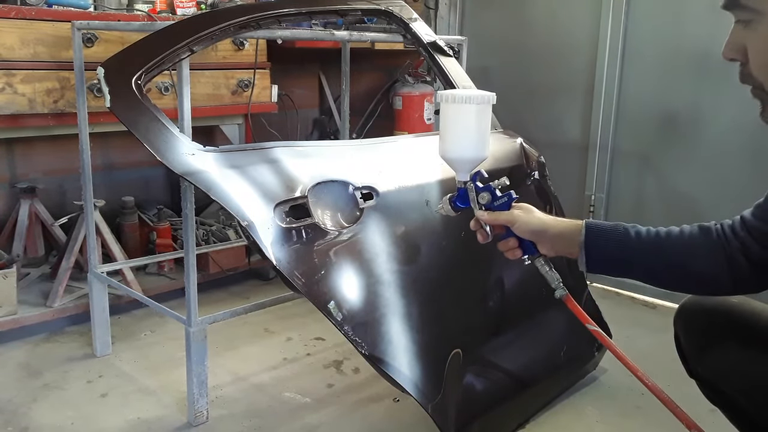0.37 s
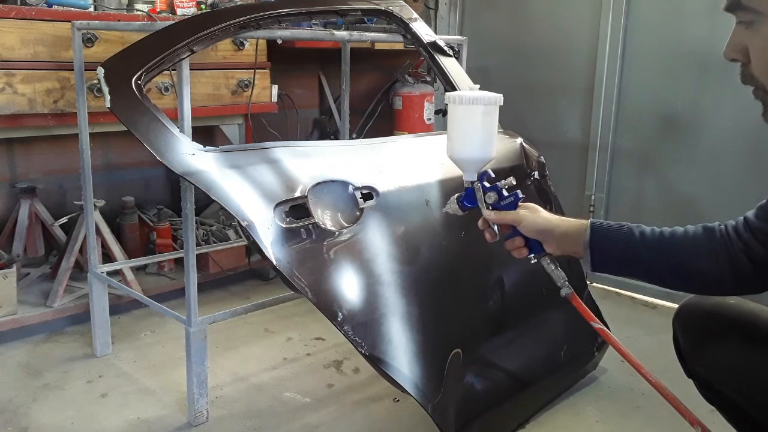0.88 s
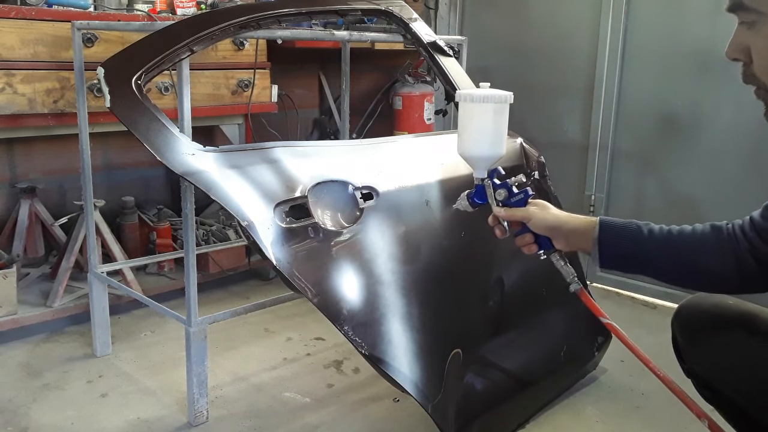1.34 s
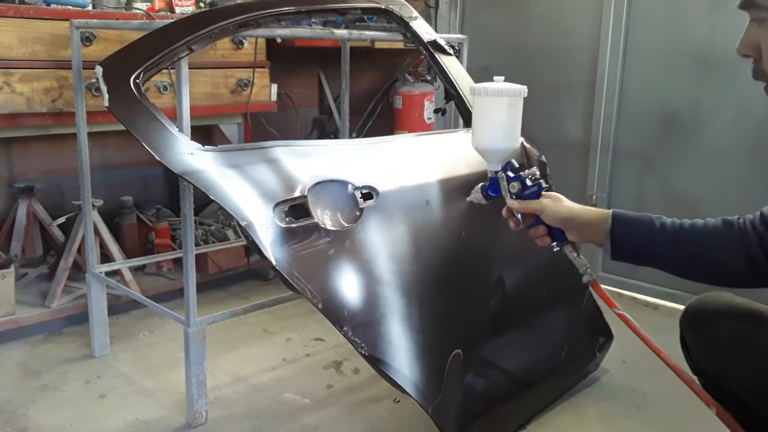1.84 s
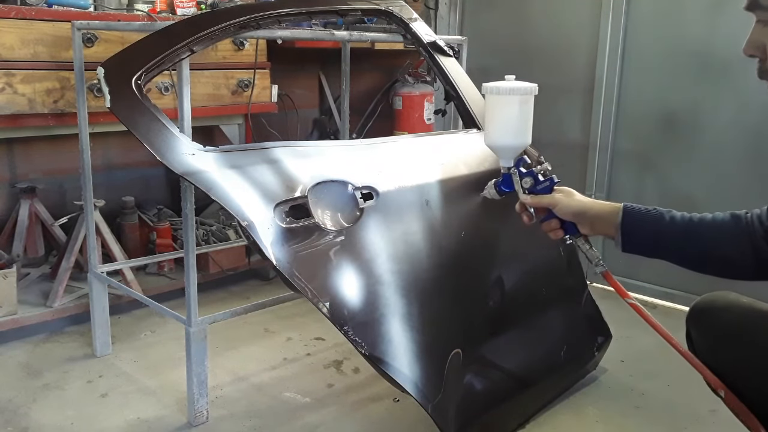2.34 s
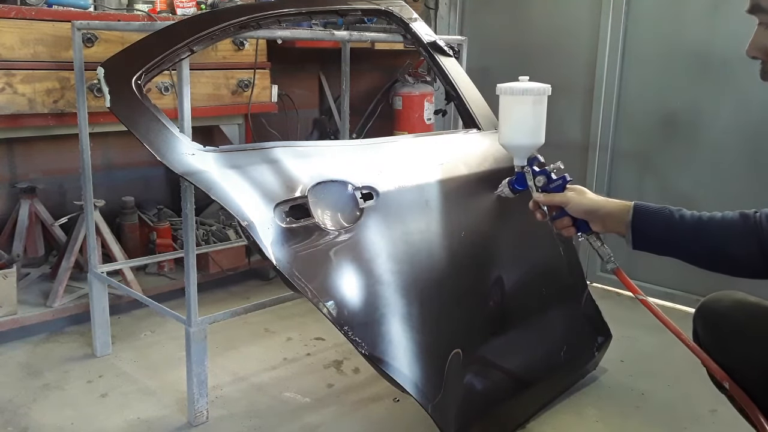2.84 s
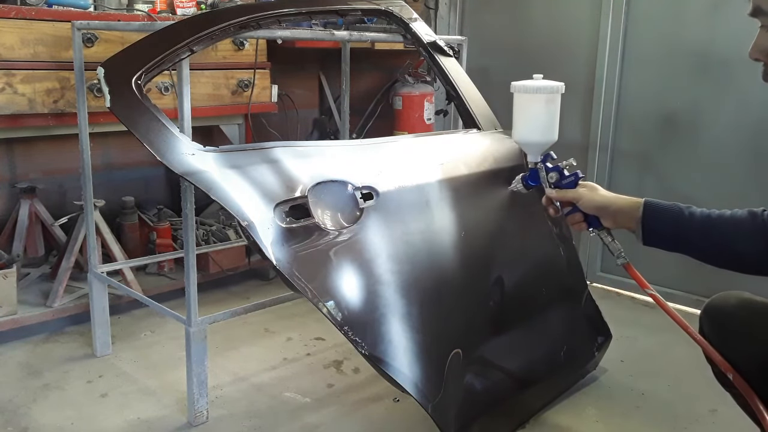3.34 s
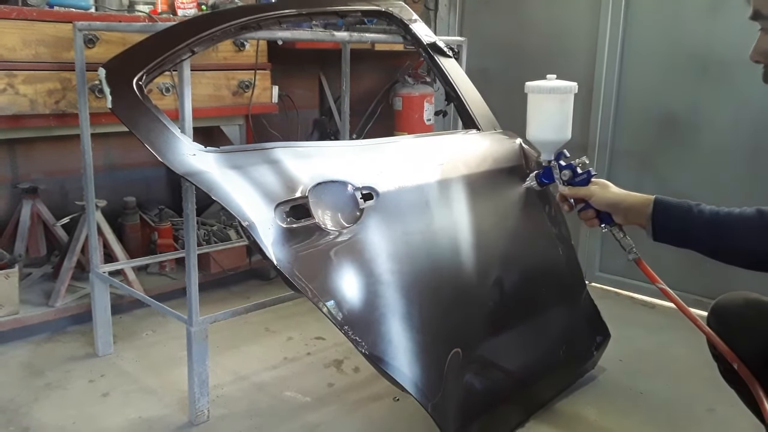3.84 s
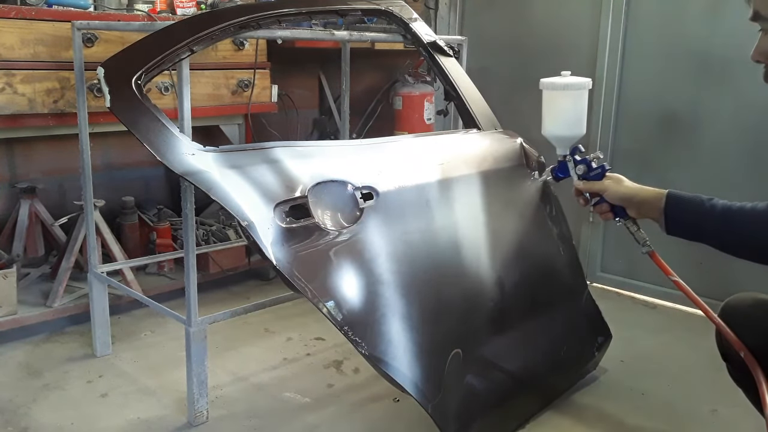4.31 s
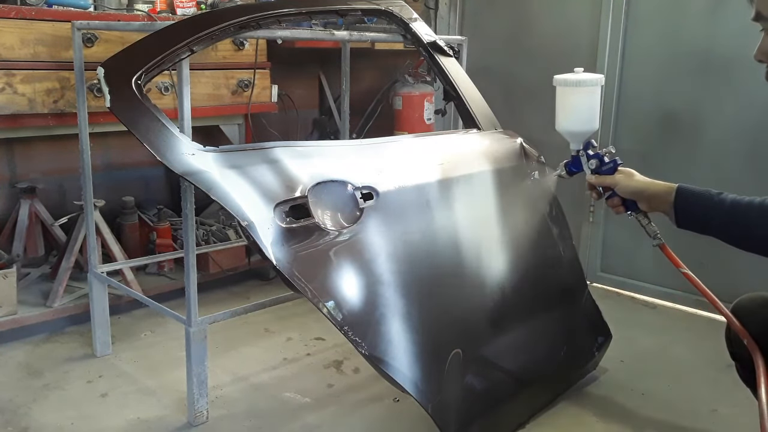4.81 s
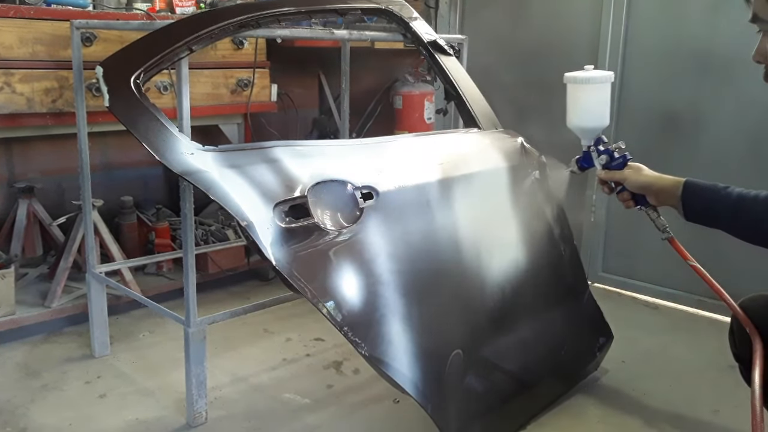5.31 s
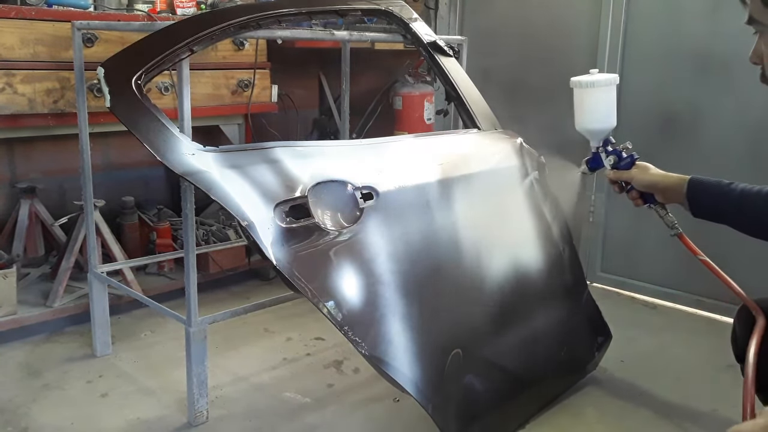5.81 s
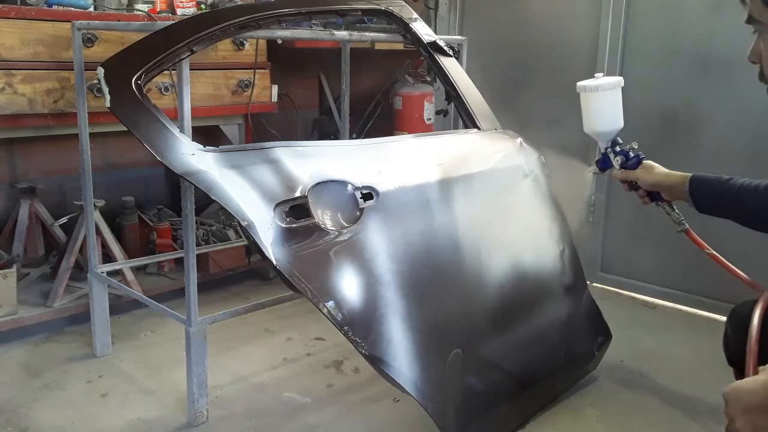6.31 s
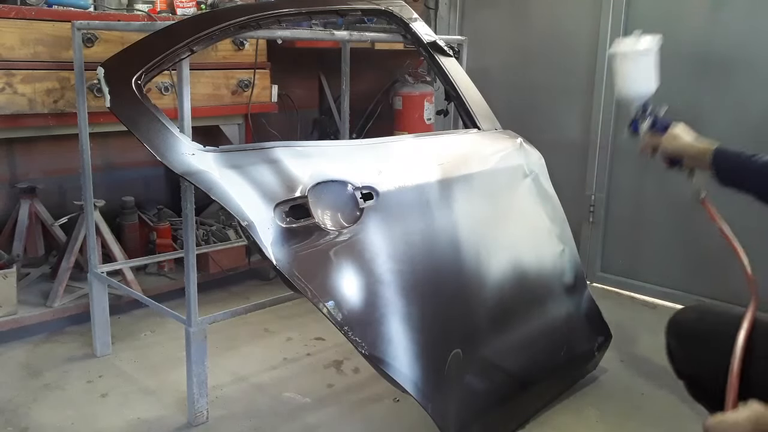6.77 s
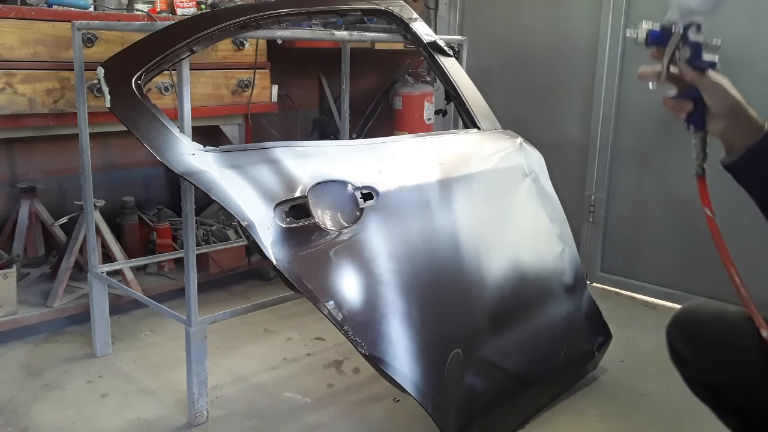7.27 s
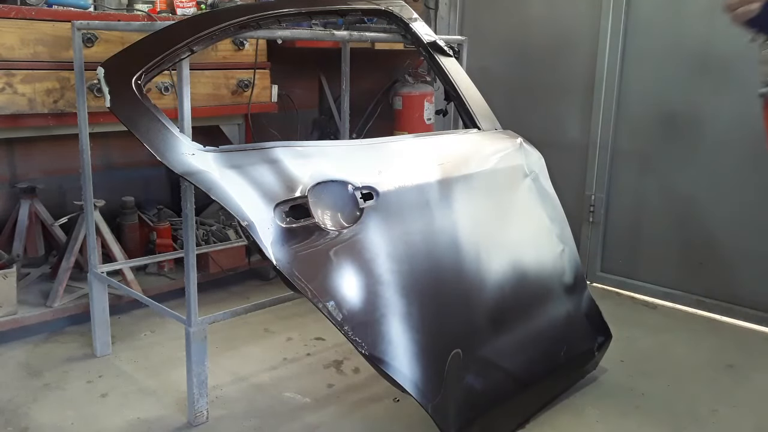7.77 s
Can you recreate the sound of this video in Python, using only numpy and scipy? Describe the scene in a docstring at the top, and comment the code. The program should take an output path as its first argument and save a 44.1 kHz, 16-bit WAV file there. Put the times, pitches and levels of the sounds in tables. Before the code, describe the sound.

A spray gun hisses loudly and steadily at a metal car door in a workshop, widens into a rougher rush, then cuts off with small clicks.

```python
"""In a hard-walled workshop a spray gun hisses at a steel door panel, draws away, closes in again and shuts off.
Turbulent air makes the fizz at the nozzle and a roar that grows as the paint fan opens, both flickering noise.
The blast drums resonant modes of the panel, mostly up close, and the walls store the sound and ring out after it.
Under it lie a low rumble, cloth rustle, scuffs and shuffles, which swell after the spraying among small clicks.
One microphone feeds both channels, and each channel has its own faint hiss."""
import sys
import numpy as np
from scipy import signal
from scipy.fft import rfft, irfft, next_fast_len
from scipy.io import wavfile
from scipy.ndimage import uniform_filter1d, map_coordinates

SR = 44100
rng = np.random.default_rng(int(sys.argv[2]) if len(sys.argv) > 2 else 0)


def gain_from_decibels(decibels):
    """Convert decibel values to linear amplitude factors."""
    exponent = np.asarray(decibels, float) / 20
    return 10 ** exponent


def unload_wav(signal):
    """Save mono or channel-first audio to the path in sys.argv[1] as 16-bit WAV at rate SR, clipped to [-1, 1]."""
    wavfile.write(
        sys.argv[1],
        SR,
        np.round(np.clip(np.atleast_2d(signal).T, -1, 1) * 32767).astype(np.int16),
    )


N = 348390

# the gun's air valve: (shutting time [s], time for the air left in the gun to fall by 60 dB [s])
AIR_VALVE = (6.732, 0.021)
# the painter's hand on the gun: (time [s], air level at the nozzle [dB], paint fan opening [0-1], gap to panel [m])
PAINTER_HAND = [(0.0, -22, 0, .14), (0.2, -23.5, 0, 0.094), (0.4, -23.5, 0, 0.13), (0.82, -23, 0, 0.097),
                (1.2, -23, 0.01, 0.13), (2.8, -23.5, 0.04, 0.17), (3.5, -23.5, 0.08, 0.25),
                (3.75, -25.5, 0.28, 0.37), (4.34, -27, 0.49, 0.75), (5.13, -24, 0.57, .4),
                (5.7, -25.5, 0.84, 0.59), (6.68, -25, 1, 0.18)]
# low-frequency colour of the building and of the buffeting blast: (frequency [Hz], relative density [dB per Hz])
RUMBLE_SPECTRUM = [(25, -30), (50, -11), (70, -2.5), (95, -5), (125, -5), (150, -3), (200, -4.5),
                   (320, -14.5), (600, -42)]


def gun():
    """Turbulent air: eddies flutter the whole jet and droplets spit in the fizz, until the valve shuts."""
    # colour of the air at the nozzle: (frequency [Hz], relative density [dB per Hz])
    fizz_spectrum = [(1000, -59.5), (2500, -29), (6000, -5), (11000, 1.5), (14800, -1), (15700, -0.5)]
    # colour of the wider jet: (frequency [Hz], relative density [dB per Hz])
    roar_spectrum = [(150, -53), (400, -23), (1000, -13), (2500, -7.5), (3600, -1), (5000, 2), (7000, -3),
                     (12000, -3), (16000, -19.5)]
    roar_db, paint_adds_db = -8, 10  # roar over the fizz with air alone; gain with the fan fully open
    spurt_db, spurt_s = 6, 0.06  # the nozzle fizzes up as the valve narrows

    air_db, paint, _ = curves(PAINTER_HAND)
    air_db = air_db + 0.18 * wobble(7) + 0.083 * wobble(25)
    before_shutting_s = AIR_VALVE[0] - np.arange(N) / SR
    spurt = spurt_db * np.clip(1 - before_shutting_s / spurt_s, 0, 1)
    fizz_gain = gain_from_decibels(air_db + spurt + 0.81 * wobble(400))
    fizz = fizz_gain * rush(fizz_spectrum, patchy_db=-0.86)
    roar_gain = gain_from_decibels(air_db + roar_db + paint_adds_db * paint + 0.41 * wobble(250))
    roar = roar_gain * rush(roar_spectrum, patchy_db=-0.2)
    return (fizz + roar) * after_shutting(AIR_VALVE[1])


def after_shutting(t60):
    """Gain 1 while the trigger is held, then a fall of 60 dB in t60 seconds."""
    return gain_from_decibels(-60 * np.clip(np.arange(N) / SR - AIR_VALVE[0], 0, None) / t60)


def bounced(x):
    """A small surface nearby returns the treble late; the comb of peaks glides as the extra path changes."""
    # the reflection's detour: (time [s], extra path [m])
    detour = [(0.0, 0.256), (0.4, 0.224), (3.3, 0.25), (5.0, 0.21), (6.0, 0.198), (6.7, 0.18)]
    bounce_db, bounce_above_hz, sound_m_per_s = -13.5, 4200, 343
    late = np.arange(N) - curves(detour)[0] / sound_m_per_s * SR
    treble = filtered(x, lambda hz: hz ** 4 / (hz ** 4 + bounce_above_hz ** 4))
    reflection = map_coordinates(treble, [late], order=3, mode="mirror")
    return x + gain_from_decibels(bounce_db) * reflection


def panel():
    """The air blast shakes the modes of the sheet metal, less as the gap grows, and they die after the jet stops."""
    # ringing modes of the door panel: (frequency [Hz], width [Hz], relative level [dB])
    panel_modes = [(141, 44, -3), (218, 37, -1.5), (301, 37, -1.5), (331, 24, 0), (423, 98, -2.5),
                   (569, 43, 1), (665, 290, -4.5)]
    # the door booms as the jet sweeps off its edge: (peak time [s], peak level [dB], rise [s])
    boom_moments = [(6.46, -58, .25), (6.61, -55.5, .2)]
    # colour of those booms: (frequency [Hz], relative density [dB per Hz])
    boom_spectrum = [(60, -7), (105, -12), (140, 4.5), (180, -8), (300, -23.5)]
    near_m, drumming_db, buffet_db = 0.1, -46, -67  # levels at this gap
    drumming_loss_db, buffet_loss_db = 14, 5.5  # per doubling of the gap
    gusts_db = 1.5  # unsteadiness of the blast

    gap_m = curves(PAINTER_HAND)[2]
    doublings = np.log2(np.clip(gap_m, 0.01, None) / near_m)
    ringing = filtered(rng.standard_normal(N), resonances(panel_modes))
    # little sound outside the modes' range
    shaking = unit(filtered(ringing, lambda hz: hz * hz / (hz * hz + 150 ** 2) / (1 + (hz / 800) ** 2)))
    drumming_gain = gain_from_decibels(drumming_db - drumming_loss_db * doublings + gusts_db * wobble(5.5))
    buffet_gain = gain_from_decibels(buffet_db - buffet_loss_db * doublings + gusts_db * wobble(11))
    blast = drumming_gain * shaking + buffet_gain * rush(RUMBLE_SPECTRUM, patchy_db=-2.5)
    booms = swells(boom_moments, t60=0.55) * rush(boom_spectrum, patchy_db=2.0)
    return blast * after_shutting(1.0) + booms


def shelves(x):
    """Steel around the room has narrow modes that ring along with the jet."""
    # modes of the steel: (frequency [Hz], width [Hz], level [dB])
    shelf_modes = [(137, 8, 0), (594.6, 7.4, 7), (763, 3.6, 1.5), (818, 7.2, 6.5)]
    return filtered(x, resonances(shelf_modes))


def workshop(x):
    """A diffuse field: the sound energy of each band is stored in the room and dies at its own speed."""
    # how long the room rings: (frequency [Hz], time to fall by 60 dB [s])
    room_decay = [(100, 0.7), (700, 0.88), (2000, 0.77), (5500, 0.62), (8000, 0.52), (12000, 0.37),
                  (16000, 0.27)]
    hz, t, z = signal.stft(x, SR, nperseg=256)
    energy = uniform_filter1d(np.abs(z) ** 2, size=3, axis=0)
    kept = gain_from_decibels(-2 * 60 * t[1] / along(room_decay, hz))  # share of energy that survives one frame
    start = kept * energy[:, :30].mean(axis=1)  # the room is already ringing
    stored = [signal.lfilter([1 - k], [1, -k], row, zi=[s])[0] for k, row, s in zip(kept, energy, start)]
    noise = signal.stft(resonant_noise(depth_db=1.5), SR, nperseg=256)[2]
    noise /= np.sqrt(np.mean(np.abs(noise) ** 2))  # many paths add at random phases
    return signal.istft(noise * np.sqrt(np.abs(stored)), SR, nperseg=256)[1][:N]


def resonant_noise(depth_db):
    """White noise through many narrow room resonances whose strengths drift slowly."""
    z = signal.stft(rng.standard_normal(N), nperseg=2048)[2]
    field = uniform_filter1d(rng.standard_normal(z.shape), size=30, axis=1)
    return signal.istft(z * gain_from_decibels(depth_db * unit(field)), nperseg=2048)[1][:N]


def clicks():
    """Each small knock is a few cycles of ringing plus a short snap of treble noise."""
    # hose and fittings: (time [s], level [dB], ring frequency [Hz], snap relative to that level [dB])
    fitting_clicks = [(7.2024, -54, 5540, -20), (7.3204, -60, 6870, -18), (7.571, -53, 4550, -20),
                      (7.578, -48, 4630, -22), (7.5884, -54, 4530, -18), (7.5984, -51.5, 3900, -14),
                      (7.6254, -59, 4100, -15), (7.7467, -56, 3800, -8), (7.7754, -58, 6560, -13),
                      (7.792, -54, 3600, -25), (7.792, -58, 900, -30), (7.8014, -57, 5530, -23),
                      (7.8874, -53, 6840, -17), (7.8924, -51.5, 5250, -18)]
    out, t = np.zeros(N + SR), np.arange(SR // 50) / SR
    # differencing three times leaves mostly treble; the divisor restores rms 1
    snaps = np.diff(rng.standard_normal((len(fitting_clicks), len(t) + 3)), 3, axis=1) / np.sqrt(20)
    for (s, db, hz, snap_db), snap in zip(fitting_clicks, snaps):
        cycles = hz * t
        onset = 1 - np.exp(-cycles / 0.5)
        ring = np.sin(2 * np.pi * cycles) * onset * gain_from_decibels(-60 * cycles / 6)  # loses 60 dB in 6 cycles
        fading_snap = gain_from_decibels(snap_db - 60 * t / 0.006) * snap  # loses 60 dB in 6 ms
        out[round(s * SR):][:len(t)] += 4 * gain_from_decibels(db) * (ring + fading_snap)
    return out[:N]


def background():
    """Noise bands for the low rumble of the building and the painter's clothes and shoes moving."""
    # colours of cloth, scuffing and low shuffling: (frequency [Hz], relative density [dB per Hz])
    rustle_spectrum = [(1500, -12), (2600, -7.5), (4000, 1), (7000, -3.5), (12000, -8), (16000, -18.5)]
    scuff_spectrum = [(300, -16), (600, 2), (1000, -3.5), (1600, -8.5), (2600, -19), (4000, -36.5)]
    shuffle_spectrum = [(120, -31.5), (190, -2), (300, -4.5), (450, -9), (650, -13.5), (1000, -33)]
    # movements after the spraying: (peak time [s], peak level [dB], rise [s])
    rustle_moves = [(7.205, -72, .005), (7.33, -73, .01), (7.47, -65, .12), (7.578, -61, .015),
                    (7.75, -67, .005), (7.795, -74, .01), (7.9, -61, 0.054)]
    scuff_moves = [(7.668, -75, .04), (7.752, -75, .01), (7.795, -69, .02), (7.83, -72, .03)]
    shuffle_moves = [(7.22, -72, .05), (7.34, -70, .05), (7.66, -66, 0.068)]
    rumble_db, rustle_db, scuff_db, shuffle_db = -70.5, -73.5, -77.5, -77.5  # steady levels

    rumble = gain_from_decibels(rumble_db) * rush(RUMBLE_SPECTRUM, patchy_db=0.0)
    rustle_gain = np.hypot(gain_from_decibels(rustle_db), swells(rustle_moves, t60=0.6)) * gain_from_decibels(2 * wobble(150))
    rustle = rustle_gain * rush(rustle_spectrum, patchy_db=0.5)
    scuff_gain = np.hypot(gain_from_decibels(scuff_db), swells(scuff_moves, t60=0.6))
    scuff = scuff_gain * rush(scuff_spectrum, patchy_db=1.0)
    shuffle_gain = np.hypot(gain_from_decibels(shuffle_db), swells(shuffle_moves, t60=0.5))
    shuffle = shuffle_gain * rush(shuffle_spectrum, patchy_db=1.0)
    return rumble + rustle + scuff + shuffle


def rush(spectrum, patchy_db):
    """Coloured noise of rms 1 with patches of random gain over time and frequency."""
    z = signal.stft(rng.standard_normal(N), nperseg=512)[2]
    field = uniform_filter1d(rng.standard_normal(z.shape), size=8, axis=0)
    field = uniform_filter1d(field, size=10, axis=1)
    patchy = signal.istft(z * gain_from_decibels(patchy_db * unit(field)), nperseg=512)[1][:N]
    return unit(filtered(patchy, lambda hz: gain_from_decibels(along(spectrum, hz))))


def resonances(modes):
    """The summed response of (Hz, width Hz, dB) modes with alternating signs."""
    def response(f):
        return sum((-1) ** k * gain_from_decibels(db) * 1j * f * w / (c * c - f * f + 1j * f * w)
                   for k, (c, w, db) in enumerate(modes))
    return response


def swells(rows, t60):
    """A gain that climbs 20 dB to each peak in its rise time, then falls 60 dB in t60 seconds."""
    t = np.arange(N) / SR
    power = 0
    for s, db, rise in rows:
        power = power + gain_from_decibels(db + np.where(t < s, 20 * (t - s) / rise, 60 * (s - t) / t60)) ** 2
    return np.sqrt(power)


def wobble(rate):
    """A smooth random curve, rate knots a second."""
    return map_coordinates(rng.standard_normal(int(N * rate / SR) + 4), [np.arange(N) * rate / SR])


def curves(rows):
    """One value per sample for each column after the time."""
    s, *cols = np.transpose(rows)
    return [np.interp(np.arange(N) / SR, s, c) for c in cols]


def along(points, hz):
    """(Hz, value) points joined on a log frequency axis."""
    f, v = np.transpose(points)
    return np.interp(np.log(hz + 1), np.log(f + 1), v)


def filtered(x, response):
    """x times a complex response of frequency."""
    m = next_fast_len(N + 8192)
    return irfft(rfft(x, m) * response(np.fft.rfftfreq(m, 1 / SR)), m)[..., :N]


def unit(x):
    """Scaled to rms 1."""
    return x / np.sqrt(np.mean(x ** 2) + 1e-20)


def scene():
    """The gun is heard mostly off the walls; the clicks are nearer."""
    jet, near = bounced(gun()), clicks()
    walls = workshop(gain_from_decibels(-1.5) * jet + gain_from_decibels(-4) * near) + shelves(jet)
    heard = gain_from_decibels(-5.5) * jet + walls + panel() + near + background()
    return np.array([heard, heard])


def band_limit(x):
    """A steep low-pass at the top of the band."""
    return signal.sosfilt(signal.butter(12, 17110, fs=SR, output="sos"), x)


def record(dry):
    """The microphone port lifts one band of treble and notches the next; each channel adds its own hiss."""
    # the microphone's response: (frequency [Hz], gain [dB])
    port_response = [(20, -16.5), (100, 2.5), (300, 1), (5000, -1.5), (6900, 5.5), (8000, -2),
                     (9300, -12.5), (10800, -6), (12500, 2.5), (16000, 8)]
    top_hz, edge_hz = 15750, 25  # steep upper limit of the treble
    hiss = gain_from_decibels(-83) * rng.standard_normal(dry.shape)
    port = filtered(dry, lambda hz: gain_from_decibels(along(port_response, hz)))
    mix = filtered(port + hiss, lambda hz: 0.5 - 0.5 * np.tanh((hz - top_hz) / edge_hz))
    return band_limit(mix)


dry = scene()
out = record(dry)
unload_wav(out)
```